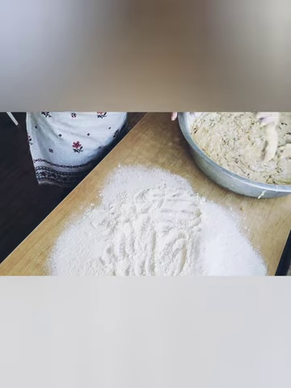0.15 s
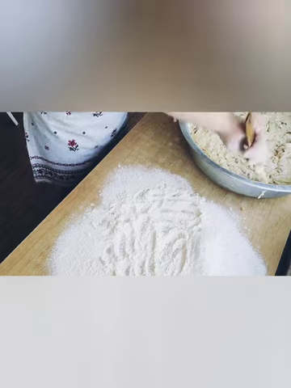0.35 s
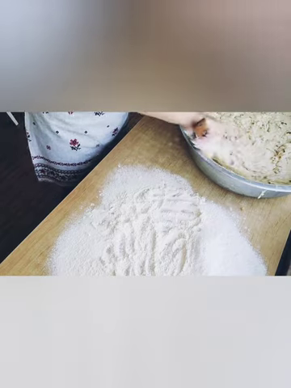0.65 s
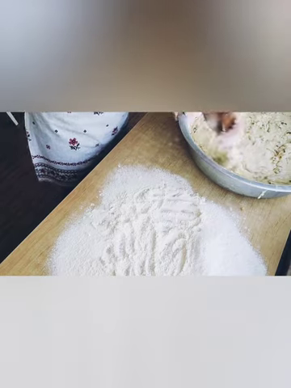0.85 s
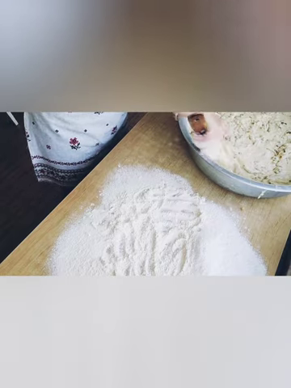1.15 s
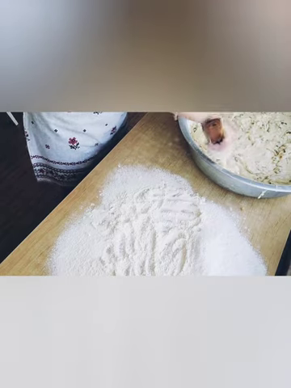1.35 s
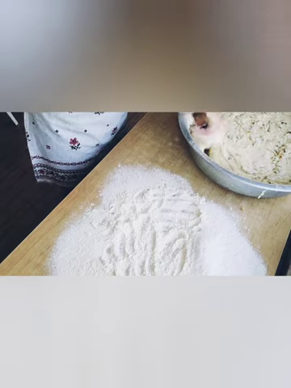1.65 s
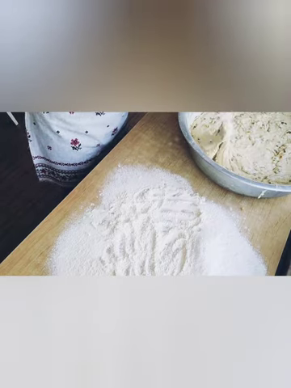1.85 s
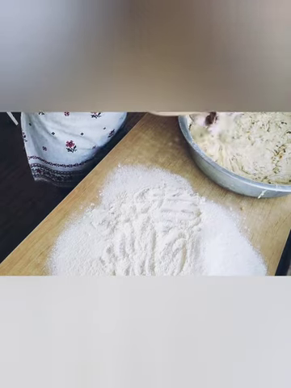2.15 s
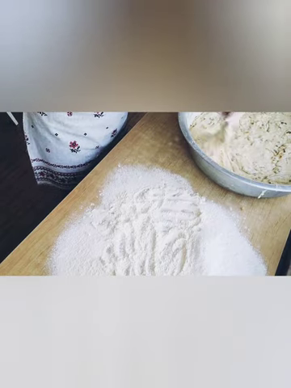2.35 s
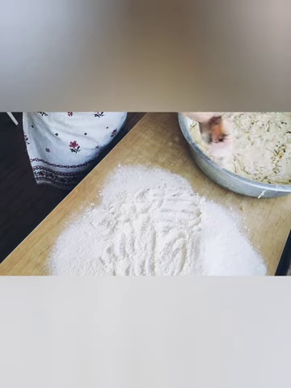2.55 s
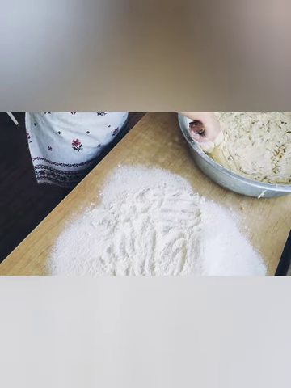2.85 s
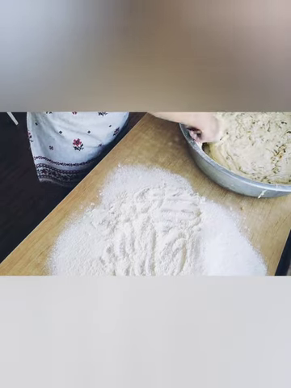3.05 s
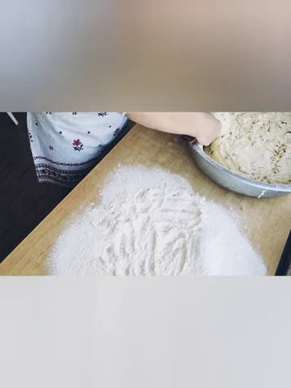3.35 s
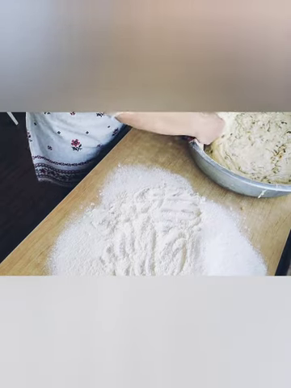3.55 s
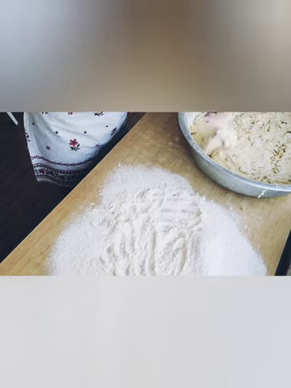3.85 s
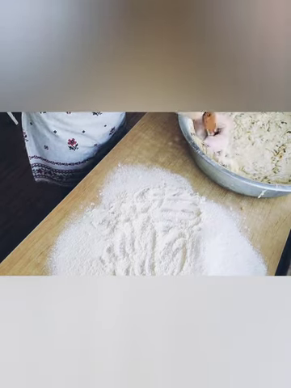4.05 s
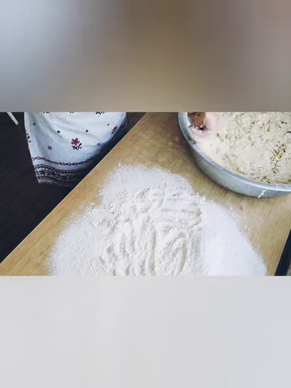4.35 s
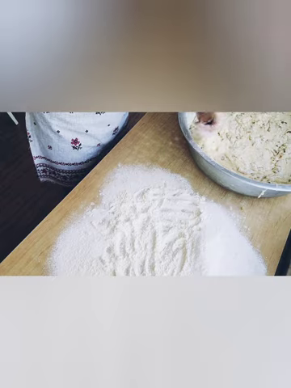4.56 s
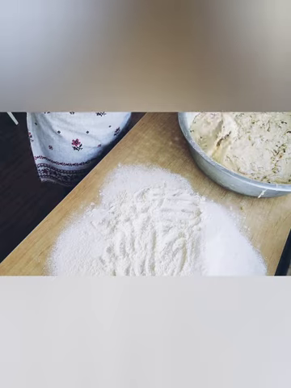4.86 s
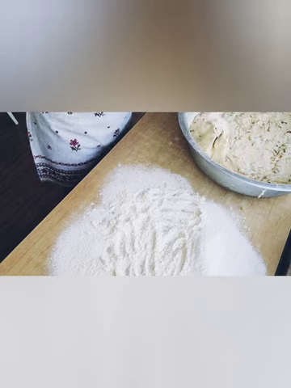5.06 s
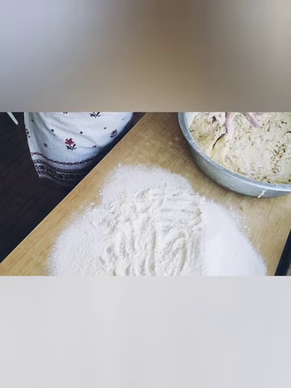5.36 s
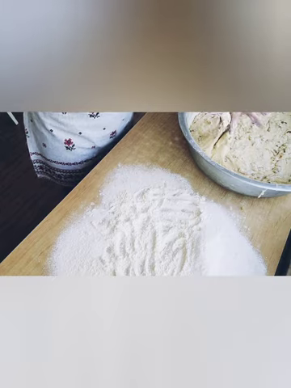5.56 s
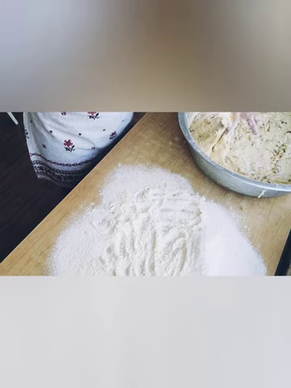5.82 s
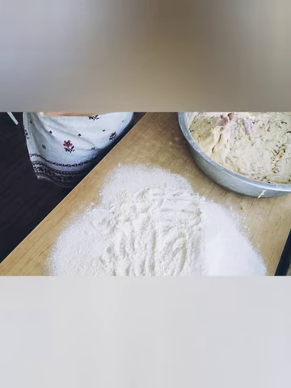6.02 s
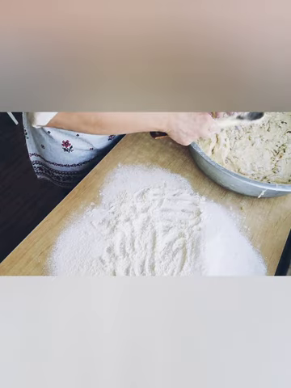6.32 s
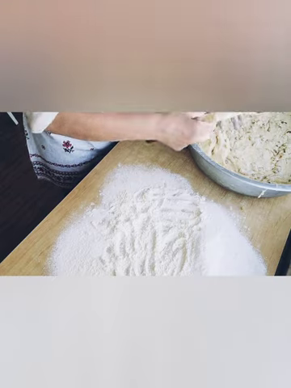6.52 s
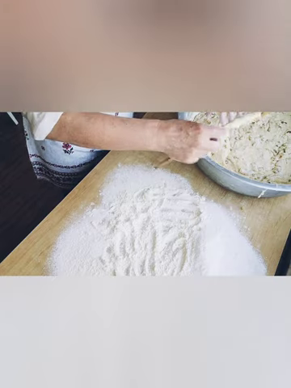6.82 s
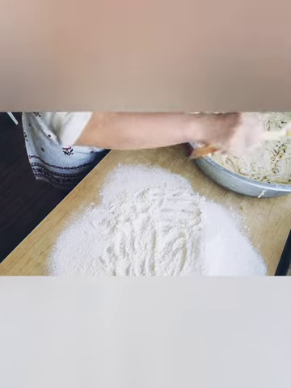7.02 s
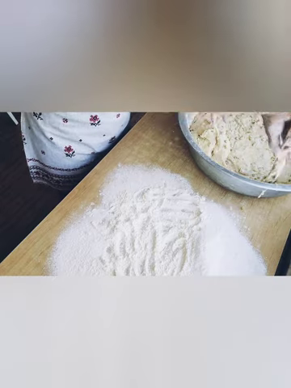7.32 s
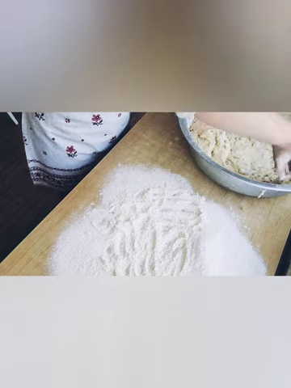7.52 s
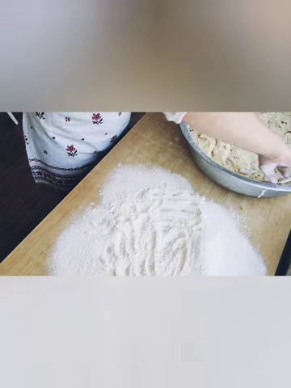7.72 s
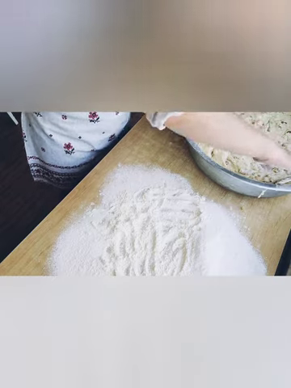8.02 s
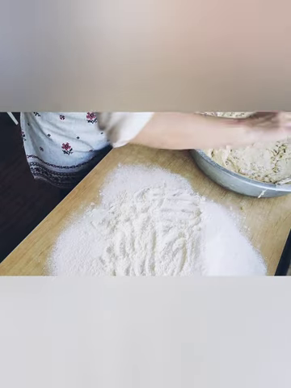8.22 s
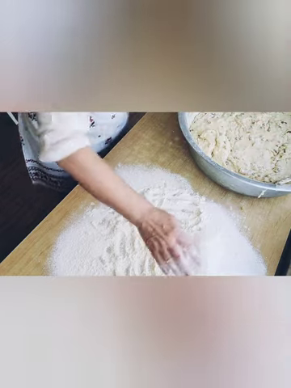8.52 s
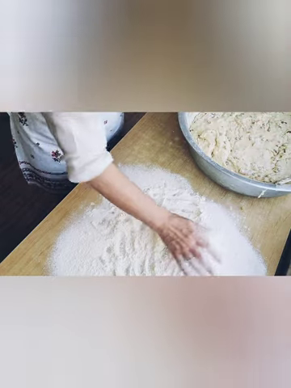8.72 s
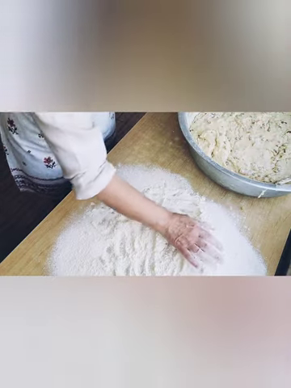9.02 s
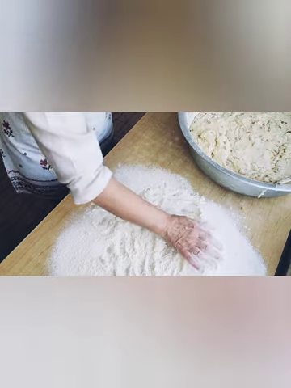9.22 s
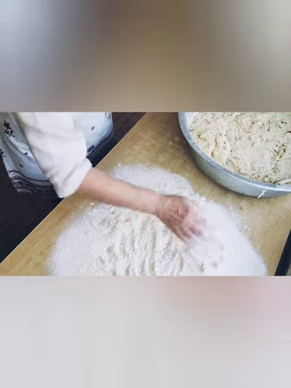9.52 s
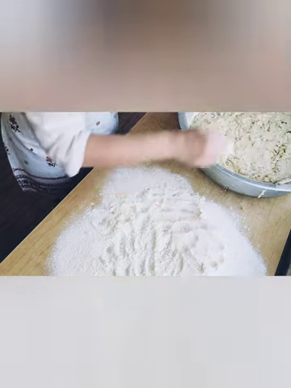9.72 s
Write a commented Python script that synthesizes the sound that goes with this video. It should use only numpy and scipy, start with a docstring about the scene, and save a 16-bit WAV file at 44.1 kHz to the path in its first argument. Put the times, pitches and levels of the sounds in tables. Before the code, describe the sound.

A wooden spoon stirs flour and crumbly dough in a metal bowl, heard close up in a small, slightly ringing kitchen. Soft, uneven strokes hiss, scrape and crunch, and clumps fall in short grainy bursts. The bowl knocks lightly on the wooden table at about 0.5 and 1 second, then rocks in a firmer cluster of knocks around 1.4 seconds. At 2.5 and 4 seconds it thumps the table hard, with a short, low metallic ring; these are by far the loudest sounds. Quiet stirring continues until about 4.6 seconds, pauses, and returns faintly around 6 seconds. A powdery swish builds from 7 seconds into a light ringing tap at 7.5 as the spoon is put down. A few softer taps follow between 8 and 8.4 seconds. Throughout, an appliance hums low over a dull rush of air, dipping briefly near 8.3 seconds, then carrying on alone.

```python
"""A small kitchen, close to a wooden table: a wooden spoon stirs flour and crumbly dough in a metal bowl.
Powder hisses, the spoon scrapes the wall, packed dough crunches and clumps fall in bursts of grains.
The loaded bowl rocks, thumps the table and rings; a few light taps follow as the spoon is put down.
An appliance hums over a dull rush of air throughout, and the room rings briefly."""
import sys
import numpy as np
from scipy import signal
from scipy.fft import rfft, irfft
from scipy.io import wavfile
from scipy.ndimage import uniform_filter1d

SR = 44100
rng = np.random.default_rng(int(sys.argv[2]) if len(sys.argv) > 2 else 0)


def master_out(mix):
    """Clip the mix to full scale and print it as 16-bit PCM to the path in sys.argv[1]."""
    frames = np.transpose(np.atleast_2d(mix))
    ceiling = np.clip(frames, -1, 1)
    pcm = np.round(ceiling * 32767).astype(np.int16)
    wavfile.write(sys.argv[1], SR, pcm)


N = 435695
T = np.arange(N) / SR
AGE = T[:SR]  # time since an onset [s]
SIDES = np.array([[1], [-1]])


def undb(db):
    """Decibels to gain."""
    return 10 ** (np.asarray(db) / 20)


def pan(left_db):
    """Channel gains, left above right by left_db."""
    return undb(SIDES * left_db / 2)


def add(out, start_s, x):
    """Mix x in at start_s, dropping what falls outside."""
    i = int(start_s * SR)
    out[:, max(i, 0):i + x.shape[-1]] += x[..., max(-i, 0):N - i]


def colour(x, spectrum, tilt_db_per_oct=0):
    """Shape white noise by (frequency [Hz], level [dB]) points and a tilt, keeping its power."""
    hz, db = np.transpose(spectrum)
    knots = np.log2(hz)
    octave = np.log2(np.maximum(np.fft.rfftfreq(x.shape[-1], 1 / SR), hz[0] / 4))
    bass_cut_db = 4.5 * np.maximum(knots[0] - octave, 0)
    gain = undb(np.interp(octave, knots, db) + tilt_db_per_oct * octave - bass_cut_db)
    return irfft(rfft(x) * gain / np.sqrt(np.mean(gain ** 2)), x.shape[-1])


def treble(x):
    """High-pass at 520 Hz."""
    return signal.sosfilt(signal.butter(2, 520, "high", fs=SR, output="sos"), x)


def walk(rate_hz):
    """Smooth random drift, unit deviation."""
    hold = int(SR / rate_hz)
    steps = np.repeat(rng.standard_normal(N // hold + 1), hold)
    drift = uniform_filter1d(uniform_filter1d(steps, hold), hold)[:N]
    return drift / drift.std()


def grains(size, spread_db):
    """Dense tiny clicks of unequal strength, barely alike left and right."""
    strength = np.repeat(undb(spread_db * rng.standard_normal(size // 16 + 1)), 16)[:size]
    clicks = (rng.standard_normal((2, size)) + 0.31 * rng.standard_normal(size)) * strength
    return clicks / clicks.std()


def kitchen(x, wet_db, t60_s):
    """Direct sound plus the room's diffuse ring, the bass alike on both sides."""
    mid, side = rng.standard_normal((2, SR))
    onset = np.clip(AGE / 0.006 - 1, 0, 1)
    tail = (mid + 0.76 * treble(side) * SIDES) * undb(-60 * AGE / t60_s) * onset
    tail /= np.sqrt(np.sum(tail ** 2) / 2)
    return x + undb(wet_db) * signal.fftconvolve(x, tail, axes=1)[:, :N]


def bowl_echoes(x, gain, count=5):
    """Reflections off the bowl's wall within 2 ms comb each spot and channel differently."""
    out = x.copy()
    for channel, direct in zip(out, x):
        for lag, sign in zip(rng.integers(8, 90, count), rng.choice([-1, 1], count)):
            channel[lag:] += gain * sign * direct[:-lag]
    return out / np.sqrt(1 + count * gain ** 2)


# air rush: (frequency [Hz], relative level [dB])
AIR_SPECTRUM = [(25, -18.5), (60, -12.5), (80, -23.5), (110, -2), (160, -12), (250, -2.5), (380, -1),
                (520, -10), (640, -10.5), (780, -23), (1050, -37), (1900, -41.5), (2800, -46),
                (15500, -48.5)]
# mains and motor tones: (frequency [Hz], level [dB], unsteadiness [0-1])
HUM_TONES = [(49.5, -57, 0.02), (95.2, -67.5, 0.4), (107.6, -64, 0.94), (209.5, -75.5, 1),
             (294.4, -58, 0.98), (361.2, -60, 1), (483, -71.5, 0.81), (587, -69.5, 0.92),
             (643, -72.5, 0.98), (1920, -96, 0.94), (4820, -100, 0.93)]


def appliance(air_db=-53, waver_hz=19, dip_s=8.26, dip_width_s=0.28, dip_db=-9.5):
    """Mains hum and wavering motor tones over a dull rush of air and a faint steady hiss."""
    mid, side = colour(rng.standard_normal((2, N)), AIR_SPECTRUM) * undb(air_db)
    lowpass = signal.butter(2, 1000, fs=SR, output="sos")
    low_mid, low_side = signal.sosfiltfilt(lowpass, [mid, side])
    flutter = undb(1.3 * walk(rate_hz=18))
    rush = (low_mid + 0.43 * low_side * SIDES) * flutter * pan(-1.7)
    hiss = (mid - low_mid + 1.23 * (side - low_side) * SIDES) * pan(0.068)
    mains = np.zeros(N)
    for hz, db, unsteady in HUM_TONES:
        waver = (walk(waver_hz) + 1j * walk(waver_hz)) / np.sqrt(2)
        phasor = np.sqrt(1 - unsteady ** 2) + unsteady * waver
        tone = np.sqrt(2) * undb(db) * np.real(phasor * np.exp(2j * np.pi * hz * T))
        if hz < 150:
            mains += tone
        else:
            rush += tone * pan(-1.5)
    drift_db = 0.75 * walk(rate_hz=4.6)
    shadow_db = dip_db * np.exp(-np.abs(T - dip_s) / dip_width_s)  # an arm reaches across the table
    return rush * undb(drift_db + shadow_db) + hiss + mains * pan(-5.0)


# spoon put down, hand brushing the rim:
# (time [s], level [dB], rise [s], fade [s], resonance [Hz], bandwidth [Hz], lift [dB])
LIGHT_TAPS = [(7.5515, -42, 0.00031, 0.028, 1300, 22, 11), (8.036, -61.5, 0.0056, 0.034, 2340, 240, 21.5),
              (8.04, -53, .005, 0.031, 1250, 111.1, 13.5), (8.145, -67, 0.0049, 0.025, 1120, 237.6, 19),
              (8.353, -47.5, 0.0084, 0.031, 2340, 260, 9.5)]
# contact noise: (frequency [Hz], relative level [dB])
TAP_SPECTRUM = [(200, 7), (600, 10.5), (1000, 0), (1350, -3), (1900, -12), (2700, -9), (3400, -18.5),
                (5000, -19), (10000, -25)]


def taps():
    """Each short rough contact sounds through one resonance."""
    out = np.zeros((2, N))
    for start_s, db, rise_s, fade_s, hz, width_hz, lift_db in LIGHT_TAPS:
        force = np.exp(-AGE / fade_s) * (1 - np.exp(-AGE / rise_s))
        contact = colour(rng.standard_normal((2, SR)), TAP_SPECTRUM) * force
        ring = signal.lfilter(*signal.iirpeak(hz, hz / width_hz, SR), contact)
        add(out, start_s, undb(db) * (contact + undb(lift_db) * ring))
    return kitchen(out * pan(0.82), wet_db=0, t60_s=0.31)


# loaded bowl: (frequency [Hz], relative level struck at wall [dB], struck at base [dB], t60 [s])
BOWL_MODES = [(81.8, -2, -19, 0.4), (161, -2.5, -4.5, 0.18), (270.3, 3.5, -7, 0.22), (336, 7, 7, 0.08),
              (367, 1.5, -6.5, 0.21), (418.8, 1, -12, 0.21), (446, -2.5, -17, 0.19), (549, 3, 0, 0.18),
              (640, -5, -14.5, 0.36), (712, -12, -41, 0.26), (765, 0.5, -7, 0.078), (803, -6.5, -11, 0.24),
              (865, -14, -16.5, 0.18), (988, -36, -19.5, 0.29), (1100, -41, -19, .28),
              (1336, -36, -29, 0.39), (1386, -21, -15.5, 0.15), (1430, -24, -39, 0.67),
              (1724, -32, -44, 0.82), (1980, -41, -18, 0.11)]
# blur of countless damped modes: (frequency [Hz], relative level [dB])
CLATTER_SPECTRUM = [(60, 2), (180, 1), (330, 6.5), (560, -4.5), (750, -3.5), (1100, -17), (2000, -22),
                    (2500, -28.5), (3000, -32), (5000, -47.5)]
# bowl on table: (time [s], blow [dB], push pitch [Hz], thud [dB], ring [dB], place [0 wall - 1 base])
BOWL_KNOCKS = [(.445, -37.5, 327, -44, -31.5, 0), (.513, -32, 299, -44, -34, 1),
               (1.001, -37, 280, -37.5, -44, 0), (1.387, -24.5, 334, -35, -30, 0.29),
               (1.4209, -19, 306, -38, -17, 0.77), (1.5, -29.5, 227, -37, -29, 0.13),
               (2.525, -7, 410, -24.5, -3, 0), (4.003, -5, 412, -25, -1, 0.99),
               (7.5505, -33.5, 613, -74, -40, 1)]


def knocks():
    """Each blow pushes the bowl's base out and back, rings its wall and flexes the table."""
    out = np.zeros((2, N))
    hz, wall_db, base_db, t60_s = np.transpose(BOWL_MODES)
    modes = np.sin(2 * np.pi * hz[:, None] * AGE) * undb(-60 * AGE / t60_s[:, None])
    # high bending waves in the tabletop arrive first, so the thud falls in pitch
    thud_hz = 56 + 170 * np.exp(-AGE / 0.012)
    swell = AGE / 0.019
    thud = (swell * np.exp(1 - swell)) ** 3 * np.sin(2 * np.pi * np.cumsum(thud_hz) / SR)
    for start_s, blow_db, push_hz, thud_db, ring_db, place in BOWL_KNOCKS:
        cycles = (AGE - 0.003) * push_hz
        push = np.sin(2 * np.pi * cycles) * np.exp(-(cycles / 0.62) ** 2) * np.minimum(AGE / 0.0014, 1)
        ring = undb(wall_db + place * (base_db - wall_db) - 25) @ modes
        mid, side = colour(rng.standard_normal((2, SR)), CLATTER_SPECTRUM)
        clatter = (mid + 1.16 * treble(side) * SIDES) * np.exp(-AGE / 0.045)
        body = (ring + undb(-23) * clatter) * np.minimum(AGE / 0.002, 1)
        add(out, start_s, undb(blow_db) * push * pan(-2.9) + undb(thud_db) * thud)
        add(out, start_s + 0.002926, undb(ring_db) * body * pan(-0.67))
    return kitchen(out, wet_db=-10, t60_s=0.52)


# breaking clumps: (time [s], level [dB], fade [s], tilt [dB/octave])
FLOUR_CLUMPS = [(.436, -36.5, 0.0091, 4), (.446, -42.5, .016, -.5), (1.057, -39.5, 0.01, 3),
                (1.4226, -28.5, 0.0083, -5), (1.934, -57, 0.052, 2.5), (2.094, -62, 0.06, 2.5),
                (3.354, -54.5, .016, 10.5), (3.653, -67.5, 0.11, 5), (4.127, -46.5, 0.014, -4.5),
                (5.886, -62.5, .018, -0.5), (7.552, -45.5, 0.022, -6)]
# powder hiss: (frequency [Hz], relative level [dB])
FLOUR_SPECTRUM = [(500, -1.5), (1200, -16.5), (2000, -5), (2500, -8.5), (3100, -4), (3700, -3.5), (4600, 0),
                  (6000, -3.5), (7600, 0), (9000, 0), (10500, 1.5), (12500, 0.5), (15500, -1.5)]


def falling_flour(shaken_rise_s=0.019, shaken_fade_s=0.03, shaken_tilt_db_per_oct=-2):
    """Falling clumps, and flour shaken loose by each knock, burst into fading grains."""
    out = np.zeros((2, N))
    # rise scales with fade: small clumps snap, large ones crumble
    clumps = [(start_s, db, 0.057 * fade_s, fade_s, tilt) for start_s, db, fade_s, tilt in FLOUR_CLUMPS]
    shaken = [(start_s, -42.5 + 0.18 * blow_db, shaken_rise_s, shaken_fade_s, shaken_tilt_db_per_oct)
              for start_s, blow_db, *_ in BOWL_KNOCKS]
    for start_s, db, rise_s, fade_s, tilt in clumps + shaken:
        burst = np.exp(-AGE / fade_s) * (1 - np.exp(-AGE / rise_s))
        powder = colour(grains(SR, spread_db=4.5), FLOUR_SPECTRUM, tilt)
        add(out, start_s, undb(db) * burst * bowl_echoes(powder, gain=0.091))
    return kitchen(out * pan(2.8), wet_db=-3, t60_s=0.31)


# wood on the bowl's wall: (frequency [Hz], relative level [dB])
SCRAPE_SPECTRUM = [(400, 2), (800, -3.5), (1120, -16), (1370, -3), (1470, 3), (1600, -14), (1760, 2.5),
                   (1880, -7), (2050, -6), (2450, -21), (3050, -9.5), (3600, -15.5), (4400, -13),
                   (6500, -31)]
# packed dough giving way: (frequency [Hz], relative level [dB])
CRUNCH_SPECTRUM = [(200, 11), (350, 13), (600, 9.5), (1000, 1), (1500, 2), (2200, -4), (2700, -15),
                   (5000, -33), (7000, -23), (12000, -38.5)]
# mix as the spoon digs in: (depth [0-1], hiss [dB], scrape [dB], crunch [dB])
DEPTH_MIX = [(0, 0.5, -31.5, -24), (.5, -4.5, 1.5, -2), (.7, -2, -1.5, 0.5), (1, -19, -12, 1.5)]
# strokes: (peak time [s], length [s], level [dB], depth [0 loose powder - 1 packed dough])
SPOON_STROKES = [(.06, 0.32, -70.5, 0.42), (.25, 0.12, -70.5, 0.76), (0.52, 0.31, -66.5, 0.47),
                 (0.634, 0.097, -48.5, 1), (.72, 0.13, -72, .03), (1.051, 0.09, -64, .03),
                 (1.143, .15, -52.5, 0.81), (1.489, 0.15, -51, 0.92), (1.69, 0.054, -68.5, .05),
                 (1.79, 0.27, -68.5, 0.27), (2.338, 0.083, -61, 0.45), (2.439, 0.071, -67, 0.57),
                 (2.675, 0.34, -58, 0.59), (2.912, 0.13, -66, .5), (3.03, 0.27, -60, 0.21),
                 (4.184, 0.18, -60.5, 0.085), (4.373, 0.1, -60, 0.77), (4.513, 0.14, -63.5, 0.61),
                 (6.004, 0.081, -65.5, 0.3), (6.244, 0.076, -67, 0.15), (6.417, .07, -73.5, .03),
                 (7.136, 0.13, -65.5, 0.066), (7.28, 0.22, -70.5, 0), (7.461, 0.067, -51, 0),
                 (7.57, .1, -52.5, 0.27), (7.663, 0.056, -57, 0.13)]


def stirring(rise_share=0.52, lead_s=0.5):
    """The spoon's pressure makes powder hiss, wood scrape the bowl's wall and packed dough crunch."""
    out = np.zeros((2, N))
    from_peak_s = AGE - lead_s
    share = np.where(from_peak_s < 0, rise_share, 1 - rise_share)
    powder = colour(grains(N + SR, spread_db=2.5), FLOUR_SPECTRUM)
    scrape = colour(grains(N + SR, spread_db=3), SCRAPE_SPECTRUM)
    crunch = colour(grains(N + SR, spread_db=3), CRUNCH_SPECTRUM)
    depths, *layers_db = np.transpose(DEPTH_MIX)
    for peak_s, length_s, db, depth in SPOON_STROKES:
        hiss_db, scrape_db, crunch_db = (db + np.interp(depth, depths, layer) for layer in layers_db)
        pressure = np.exp(-(from_peak_s / length_s / share) ** 2)
        span = slice(int(peak_s * SR), int(peak_s * SR) + SR)
        hiss = undb(hiss_db) * bowl_echoes(powder[:, span], gain=0.44) * pan(4.1)
        rub = (undb(scrape_db) * scrape[:, span] + undb(crunch_db) * crunch[:, span]) * pan(1.0)
        add(out, peak_s - lead_s, pressure * (hiss + rub))
    stick_slip = undb(2.0 * walk(rate_hz=45))
    return kitchen(out * stick_slip, wet_db=-8, t60_s=0.46)


def scene():
    """Everything on and around the table."""
    return knocks() + falling_flour() + stirring() + taps() + appliance()


def record(dry):
    """Steep low-pass at 15.8 kHz."""
    return signal.sosfilt(signal.ellip(10, 0.2, 70, 15800, fs=SR, output="sos"), dry)


dry = scene()
out = record(dry)
master_out(out)
```